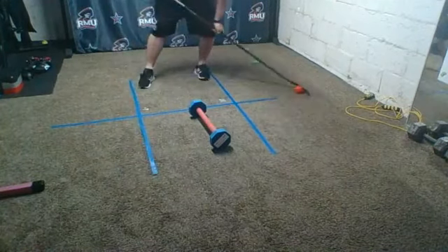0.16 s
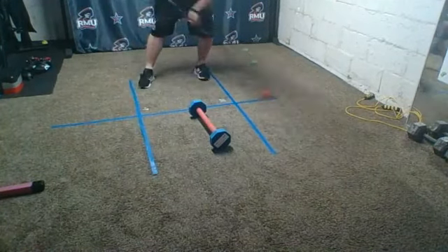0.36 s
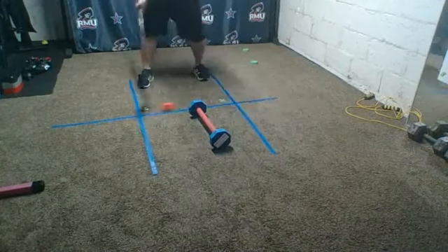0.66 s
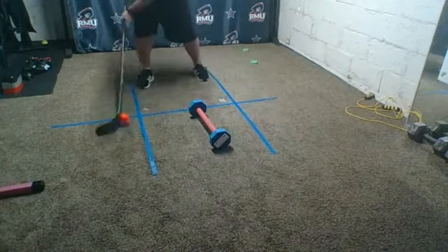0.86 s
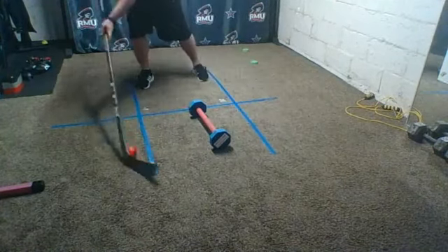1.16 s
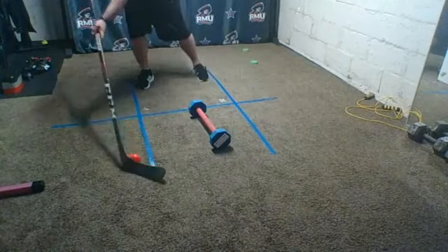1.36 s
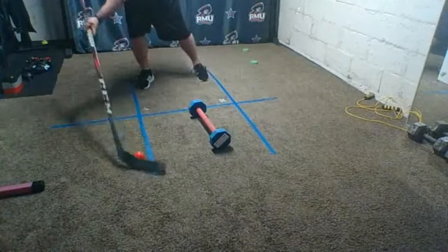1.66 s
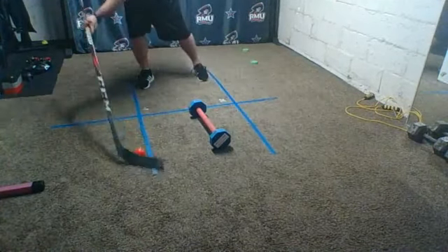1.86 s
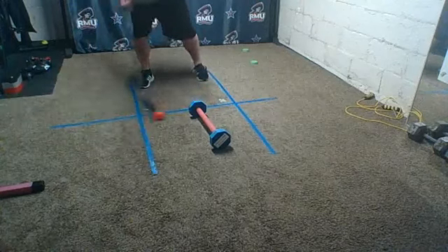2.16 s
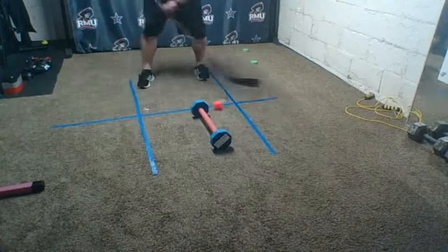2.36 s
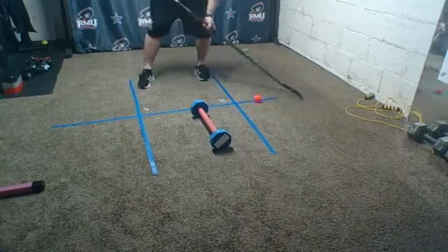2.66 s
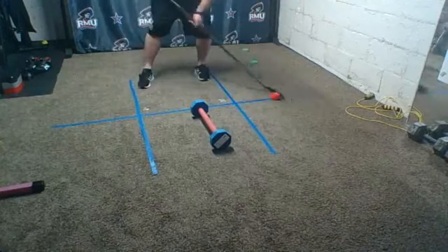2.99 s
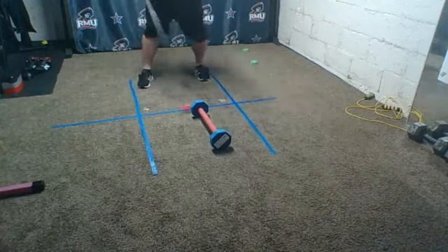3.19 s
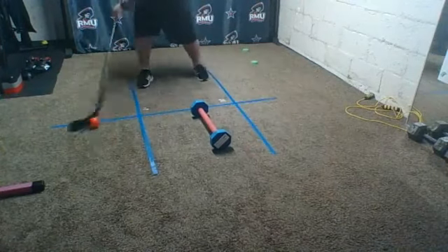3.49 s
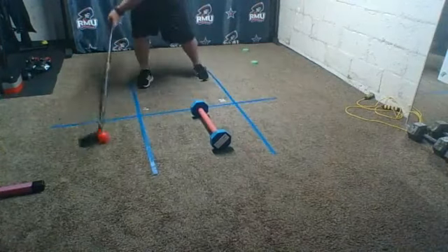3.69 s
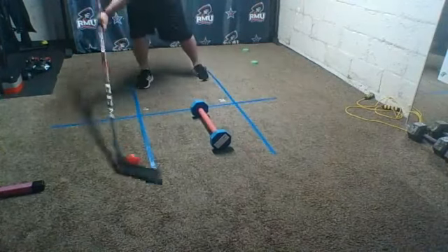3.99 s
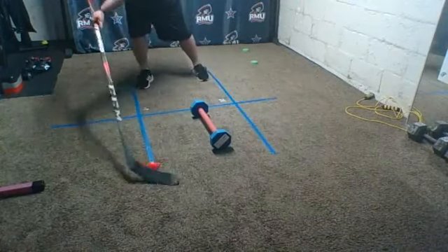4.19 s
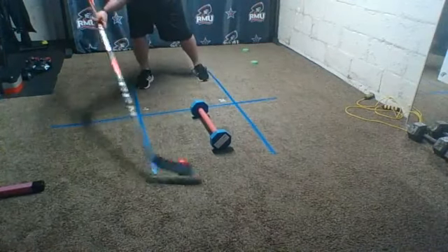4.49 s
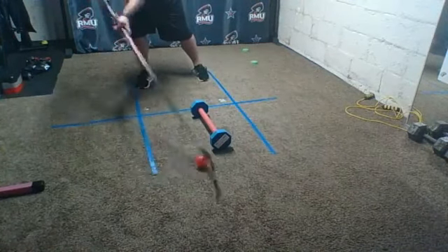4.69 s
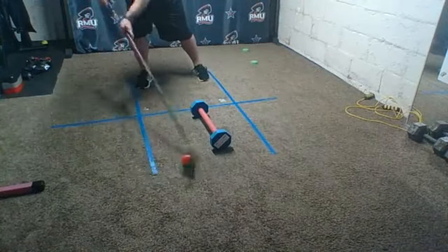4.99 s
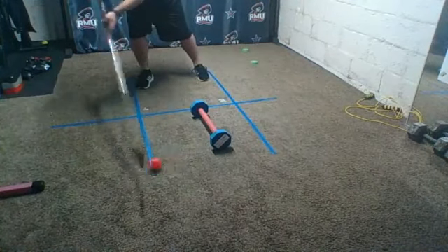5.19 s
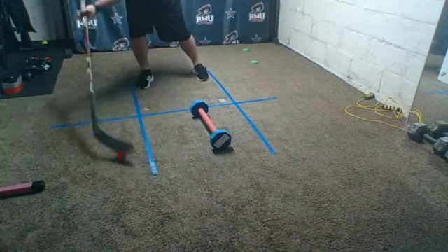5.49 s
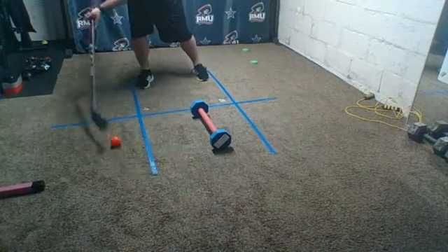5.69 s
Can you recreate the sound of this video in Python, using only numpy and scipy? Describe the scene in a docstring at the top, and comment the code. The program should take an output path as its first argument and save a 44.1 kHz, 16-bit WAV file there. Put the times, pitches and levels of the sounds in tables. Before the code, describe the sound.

A hockey stick knocks a hard hollow ball around a carpet in a small bare room, sharp uneven clacks with faint brushing and squeaks between.

```python
"""In a small bare-walled room, a hockey stick knocks a hard hollow ball about on carpet.
Each blow is a sum of dying tones from stick and ball, heard through wall echoes and a dense tail.
Between blows the blade brushes the carpet (swelling crackle), squeaks (narrow noise) and clicks.
Under it lie drifting noise and two faint whines. A noise suppressor lowers the quiet moments,
twice the sound drops out, and the highest treble is cut."""
import sys
import numpy as np
from scipy import signal
from scipy.io import wavfile
from scipy.ndimage import uniform_filter1d

SR = 44100
rng = np.random.default_rng(int(sys.argv[2]) if len(sys.argv) > 2 else 0)


def store_pcm(level_fs):
    """Save levels as 16-bit WAV."""
    pcm = np.round(np.clip(level_fs, -1, 1) * 32767).astype(np.int16)
    wavfile.write(sys.argv[1], SR, np.atleast_2d(pcm).T)


N = 257984  # length in samples

# The tones stick and ball ring with, in six groups from low to high.
# Each row: pitch in Hz, width in Hz (wider dies sooner), strength in dB against the rest of its group.
THUD_MODES = [(62, 8.1, -19), (94, 10, -5), (135, 120, -4), (184, 42, 7.5)]
THUMP_MODES = [(215, 45, -4.5), (264.6, 28, 1), (300, 13, 3.5), (385, 58, 5.5)]
KNOCK_MODES = [(458.6, 38, 1), (605, 65, 4), (720, 89, -0.5), (813, 160, 2), (1032, 92, -2.5),
               (1266, 79, -2)]
CLACK_MODES = [(1610, 210, -3.5), (1832, 55, 1), (2220, 770, 0.5), (2790, 270, 1), (3570, 460, -1)]
TICK_MODES = [(3880, 450, -3), (3984, 36, -2), (4150, 220, -8), (5084, 660, 3.5), (5600, 47, -2),
              (5983, 330, 1), (6970, 820, -1.5)]
FIZZ_MODES = [(8160, 1100, -3), (11700, 2100, 0), (13500, 3200, -5.5)]


def gain_of(db):
    """Turn decibels into a factor for the waveform."""
    return 10 ** (np.asarray(db) / 20)


def evened(x):
    """Scale a sound to an rms level of 1."""
    return x / np.sqrt(np.mean(x ** 2) + 1e-20)


def read(points, hz):
    """Read a curve of (Hz, value) points, with straight lines between them on a log pitch scale."""
    f, value = np.transpose(points)
    return np.interp(np.log(hz + 1), np.log(f + 1), value)


def add(mix, s, sound):
    """Add a sound to the mix from s seconds on, cut off at the end of the mix."""
    part = mix[max(round(s * SR), 0):][:len(sound)]
    part += sound[:len(part)]


def ring(modes, favoured_hz=1000, favour_db=0, crack_db=0):
    """Dying sines; the point of contact favours one region and changes how strongly each mode answers."""
    hz, width, db = np.transpose(modes)[:, :, None]
    t = np.arange(2048) / SR
    db = db + favour_db * np.exp(-(np.log(hz / favoured_hz) / 0.091) ** 2)
    db = db + 3.0 * rng.standard_normal(db.shape)
    # neighbours swing opposite ways, which fills the valleys between them
    sign = (-1) ** np.arange(len(modes))[:, None]
    strength = sign * gain_of(db) * np.sqrt(width)
    sines = (strength * np.exp(-np.pi * width * t) * np.sin(2 * np.pi * hz * t)).sum(0)
    # the contact itself: a very short crack, as wide as the whole group
    centre_hz, span = np.sqrt(hz.min() * hz.max()), np.ptp(hz) + width.max()
    crack = np.sqrt(span) * np.exp(-np.pi * span * t) * np.sin(2 * np.pi * centre_hz * t)
    # a small body moves hardly any air below its lowest mode
    low_cut = signal.butter(3, 0.7 * hz.min(), "high", fs=SR, output="sos")
    return signal.sosfilt(low_cut, sines + gain_of(crack_db) * crack)


def room_tone():
    """Random short-time spectra with drifting patches, and two faint whines."""
    # Colour of the air noise. Each row: Hz, strength in dB against the other rows.
    air_colour = [(15, -35), (30, -13.5), (62, 6.5), (90, -11.5), (180, -4.5), (320, -6.5), (520, -3.5),
                  (690, -11), (1500, -4), (2300, -8.5), (2900, -19), (7600, -26), (8000, -31), (10800, -21),
                  (16000, -25)]
    # How unevenly the air noise drifts. Each row: Hz, size of the drift in dB.
    unevenness = [(60, 5), (400, 2.5), (1500, 0), (6000, 4)]
    # Thin steady tones. Each row: Hz, rms level in dB.
    whines = [(8000, -81), (8824, -79.5)]
    frames, hz = N // 256 + 5, np.fft.rfftfreq(1024, 1 / SR)
    real, imaginary, patches = rng.standard_normal((frames, 513, 3)).T
    patches = uniform_filter1d(patches, size=2, axis=0)  # smooth over pitch
    patches = evened(uniform_filter1d(patches, size=10, axis=1))  # smooth over time
    level_db = read(air_colour, hz)[:, None] + read(unevenness, hz)[:, None] * patches
    z = (real + 1j * imaginary) * gain_of(level_db)
    air = signal.istft(z, nperseg=1024, noverlap=768)[1][:N]
    t = np.arange(N) / SR
    tones = sum(np.sqrt(2) * gain_of(db) * np.sin(2 * np.pi * f * t) for f, db in whines)
    return gain_of(-58) * evened(air) + tones


def click(s, half, db):
    """A very short puff of noise sets off the upper modes, with no room tail."""
    t = np.arange(-200, 200) / SR
    puff = rng.standard_normal(len(t)) * np.exp(-(t / half) ** 2)
    crackle = signal.fftconvolve(puff, ring(KNOCK_MODES[4:] + CLACK_MODES + TICK_MODES))[:600]
    return s, gain_of(db) * evened(crackle)


def squeak(s, length, hz, db):
    """The sliding blade squeaks: noise in one narrow resonance, swelling and fading."""
    t = np.arange(int(length * SR)) / SR
    narrow = signal.fftconvolve(rng.standard_normal(9000), ring([(hz, 60, 0)]))
    narrow = narrow[2000:2000 + len(t)]  # skip the start, where the resonance builds up
    return s, gain_of(db) * evened(narrow) * np.hanning(len(t))


def brush(s, rise, fall, drag_db, hiss_db):
    """Carpet fibres pluck the moving blade: many tiny clicks of uneven size that swell and fade."""
    ends_db = -24  # a stroke starts, and has faded after its fall, this far below its loudest moment
    roundness = 1.33  # 1 = pointed swell, more = flatter top
    t = np.arange(SR // 2) / SR - rise
    # chance of a pluck at each sample: 3 % for the drag, 10 % for the hiss
    fibres = rng.standard_normal((2, len(t))) * (rng.random((2, len(t))) < [[.03], [.1]])
    low_modes = THUD_MODES[2:] + THUMP_MODES + KNOCK_MODES + CLACK_MODES[:2]
    high_modes = CLACK_MODES[3:] + TICK_MODES + FIZZ_MODES
    drag = signal.fftconvolve(fibres[0], ring(low_modes))[:len(t)]
    hiss = signal.fftconvolve(fibres[1], ring(high_modes))[:len(t)]
    away = np.maximum(-t / max(rise, 1e-3), t / max(fall, 1e-3))  # 0 at the loudest moment
    stroke = gain_of(ends_db * away ** roundness)
    return s - rise, stroke * (gain_of(drag_db) * evened(drag) + gain_of(hiss_db) * evened(hiss))


def room(stretch, tail_db, build_s):
    """Direct sound, wall echoes and a dense tail; echo times and tail are drawn anew for each blow."""
    # The nearest walls. Each row: typical delay in seconds, strength in dB against the other echoes.
    wall_echoes = [(.0062, 3), (.0092, -4), (0.0162, 7), (0.024, -11), (0.028, -0.5)]
    # How long the tail rings. Each row: Hz, seconds to fall by 60 dB (before stretch).
    ring_times = [(100, 0.35), (260, 0.25), (700, 0.26), (1840, 0.25), (4850, 0.3), (12800, 0.23)]
    size = SR // 2
    # reflections as single pulses, one at a random place in every ten samples
    taps = np.zeros(size)
    places = np.arange(0, size - 10, 10) + rng.integers(0, 10, (size - 1) // 10)
    taps[places] = rng.choice([-1., 1.], (size - 1) // 10)
    hz, t, z = signal.stft(taps, SR, nperseg=256)
    fade = gain_of(-60 * t / (stretch * read(ring_times, hz)[:, None]))
    tail = signal.istft(z * fade, SR, nperseg=256)[1][:size]
    # reflections need a few crossings to pile up
    tail *= 1 - np.exp(-np.arange(size) / SR / max(build_s, 1e-4))
    out = tail / np.linalg.norm(tail)
    for s, db in wall_echoes:
        shifted_s = s * (1 + 0.15 * rng.uniform(-1, 1))
        out[int(SR * shifted_s)] += gain_of(db - 13.5)
    out *= gain_of(tail_db)
    out[0] = 1  # the direct sound
    return out


def blow(s, knock_db, weight_db, clack_db, hardness_db, tail_db, favoured_hz):
    """One touch drives every mode group, heard through the room."""
    # How the thud follows weight: dB per dB, then an offset in dB.
    thud_slope, thud_offset_db = (1.9, -8)
    stretch = np.clip(0.87 + 0.0061 * hardness_db, .05, 3)  # softer contact, shorter tail
    drive = -room(stretch, tail_db, build_s=0.004)
    groups = (
        (THUD_MODES, thud_slope * weight_db + thud_offset_db),
        (THUMP_MODES, weight_db),
        (KNOCK_MODES, 0),
        (CLACK_MODES, clack_db),
        (TICK_MODES, hardness_db),
        (FIZZ_MODES, 1.6 * hardness_db - 3.5),
    )
    out = 0
    for modes, db in groups:
        part = signal.fftconvolve(drive, ring(modes, favoured_hz, favour_db=5.5, crack_db=-4.0))
        loudest = np.sqrt(uniform_filter1d(part ** 2, size=800).max())  # in about 18 ms
        out = out + gain_of(knock_db + db) * part / loudest
    return s, out


def scene():
    """Lay squeaks, clicks, carpet strokes and blows over the room tone; levels are before the suppressor."""
    # Blows. Each row: start in seconds, knock level in dB, weight (thump against knock) in dB,
    # clack against knock in dB, hardness (tick against knock) in dB, room against direct sound in dB,
    # favoured region in Hz.
    blow_rows = [(0.001, -30.5, -4, -8.5, -17, 0.5, 275.3), (.745, -64, 1.5, -3, 7.5, 15, 3802),
                 (0.8613, -22.5, -10.5, -9, -18, 5.2, 500), (0.983, -49.5, -10.5, -10.5, -23.5, 6, 595),
                 (2.162, -21, -8.5, -11.5, -5.5, 8.5, 3990), (2.301, -33, 3, -43, -47.5, 2.5, 382),
                 (2.308, -36.5, -5.5, -4, -11.5, 23, 617), (3.050, -21, -1.5, -6, -9.5, 7, 373.5),
                 (3.112, -39, -7.5, -5.5, -5.5, 11.5, 452), (3.6261, -22.5, -9.5, -3.5, -14, 8, 603.6),
                 (3.6928, -32.5, -10.5, -11, -18, 1, 580.6), (4.137, -37, -8, -14, -20.5, 5, 1050),
                 (4.757, -67, -9.5, 10.5, -10.5, 21, 3490), (4.79, -34, -8.5, -7.5, -16.5, 6, 1255),
                 (4.897, -54, -2, -34.5, -41, 1.8, 473), (5.081, -42, -4.5, -12.5, -17, 6, 1200),
                 (5.1, -37.5, -8, -25.5, -33, -1, 492), (5.401, -62.5, 12, -10.5, -17.5, 4.5, 70),
                 (5.4316, -32.5, -7.5, -17.5, -28.5, 5.5, 916), (5.467, -35.5, -9, -10, -21.5, 1, 605)]
    # Squeaks. Each row: start in seconds, length in seconds, pitch in Hz,
    # level in dB before the swell and fade.
    squeak_rows = [(0.209, .09, 4900, -68.5), (0.285, 0.09, 3550, -64.5), (0.339, 0.084, 4940, -77),
                   (0.406, .05, 6400, -74.5), (1.118, 0.059, 5330, -73.5), (1.83, 0.064, 5860, -61.5),
                   (1.88, 0.19, 1880, -60.5), (2.077, 0.2, 2111, -59)]
    # Tiny dry clicks. Each row: start in seconds, half length of the puff in seconds, level in dB.
    click_rows = [(1.4922, 0.0014, -60.5)]
    # Strokes along the carpet. Each row: loudest moment in seconds, rise in seconds, fall in seconds,
    # drag level in dB, fibre hiss level in dB (both at the loudest moment).
    brush_rows = [(.26, .08, .08, -64, -65), (.366, .1, 0.15, -53, -66), (0.498, .1, .06, -63, -85.5),
                  (.746, .03, .1, -53.5, -56.5), (1.821, .08, .08, -59.5, -60),
                  (1.871, .08, .12, -49.5, -57), (2.0, .12, .2, -65.5, -60.5),
                  (2.14, .06, 0.022, -71, -60.5), (2.63, .03, .1, -75.5, -57.5),
                  (3.04, 0.07, .01, -55, -58.5), (3.348, .03, 0.086, -58, -97),
                  (3.456, 0.071, 0.13, -56.5, -63), (3.56, 0.13, 0.13, -55.5, -59.5),
                  (4.04, 0.11, 0.13, -62, -63), (4.115, 0.067, 0.023, -60.5, -62.5),
                  (4.78, .06, .01, -61.5, -73), (5.078, 0.032, 0.013, -56, -59),
                  (5.59, .03, 0.074, -58.5, -66.5), (5.672, 0.12, .12, -59.5, -64.5)]
    mix = room_tone()
    for row in blow_rows:
        add(mix, *blow(*row))
    for row in squeak_rows:
        add(mix, *squeak(*row))
    for row in click_rows:
        add(mix, *click(*row))
    for row in brush_rows:
        add(mix, *brush(*row))
    return mix[None]


def record(dry, open_db=-48, slope=0.6, depth_db=8, margin_db=10, bin_slope=0.66):
    """A suppressor turns down quiet moments and quiet bins; two dropouts; then the treble limit."""
    # Dropouts. Each row: start in seconds, end in seconds.
    gaps = [(1.264, 1.379), (4.383, 4.482)]
    # loudness over about 20 ms, mostly of what has just been heard
    power_db = 10 * np.log10(abs(uniform_filter1d(dry[0] ** 2, size=900, origin=300)) + 1e-12)
    hz, _, z = signal.stft(dry[0], SR, nperseg=512, noverlap=384)
    bin_db = 10 * np.log10(uniform_filter1d(abs(z) ** 2, size=6, axis=1) + 1e-20)
    floor_db = np.percentile(bin_db, 30, axis=1, keepdims=True)
    # below 7.8 kHz, bins near their usual floor sink, so mainly streaks of the faint sounds stay
    lacking_db = np.clip(margin_db - (bin_db - floor_db), 0, 20)
    bin_gain = gain_of(-bin_slope * (hz[:, None] < 7800) * lacking_db)
    out = signal.istft(z * bin_gain, nperseg=512, noverlap=384)[1][None, :N]
    out = out * gain_of(-np.clip(slope * (open_db - power_db), 0, depth_db))
    t = np.arange(N) / SR
    for start, end in gaps:
        # a sharp 20 dB drop, a fade on to the middle at 300 dB per second, and the same way back
        inside = (t > start) & (t < end)
        out[:, inside] *= gain_of(-20 - 300 * np.minimum(t - start, end - t)[inside])
    treble_limit = signal.firwin(511, 15950, window=("kaiser", 9), fs=SR)  # Hz
    return signal.oaconvolve(out, treble_limit[None], "same")


dry = scene()
out = record(dry)
store_pcm(out)
```